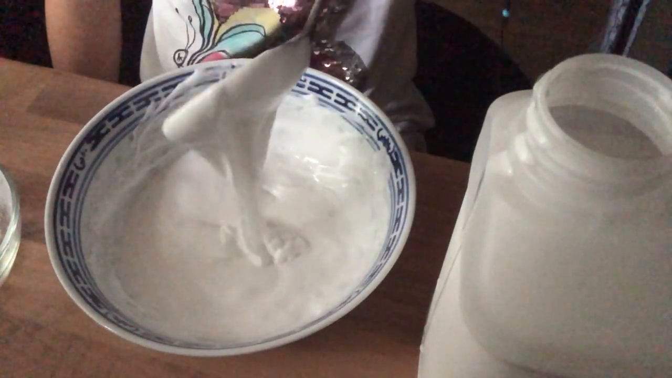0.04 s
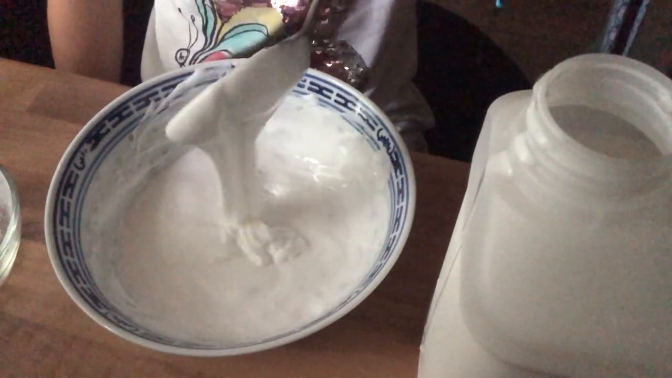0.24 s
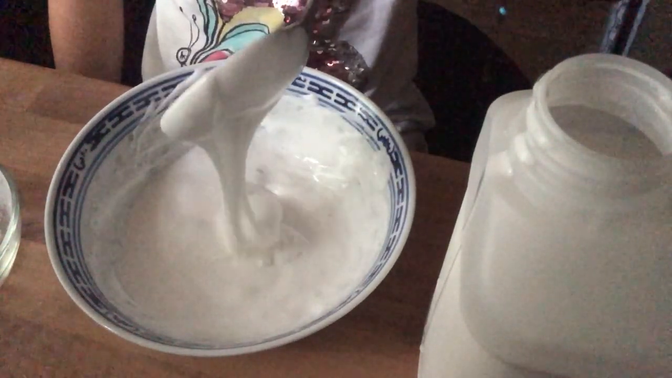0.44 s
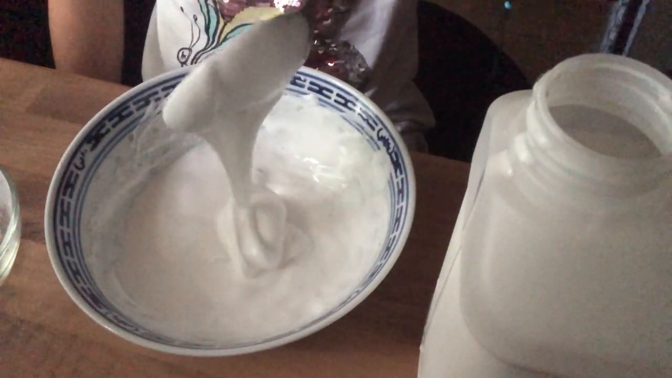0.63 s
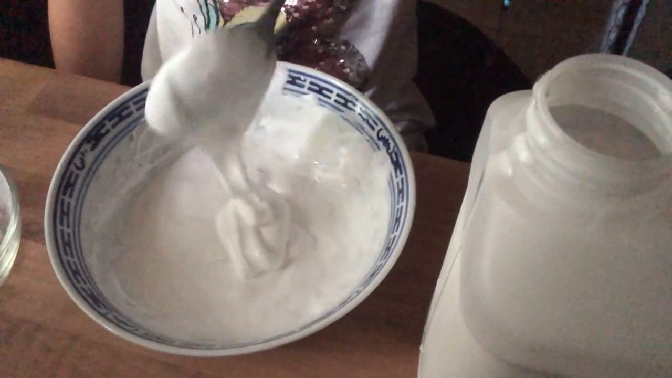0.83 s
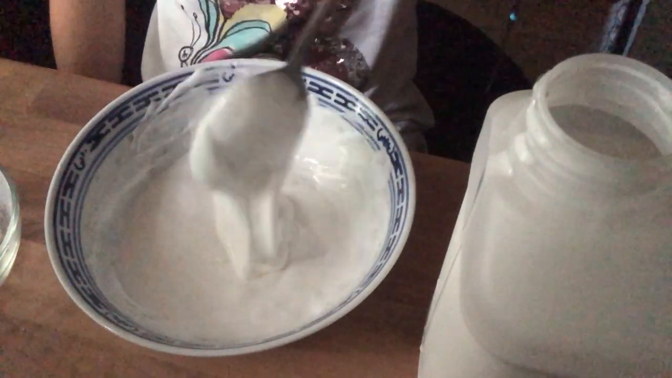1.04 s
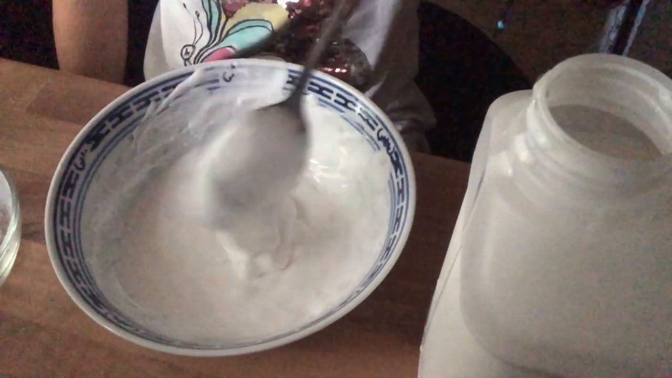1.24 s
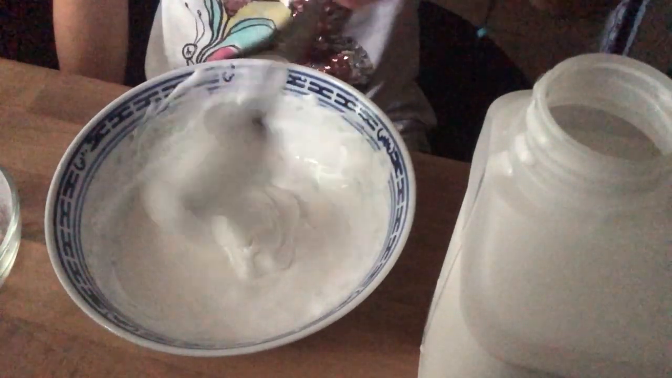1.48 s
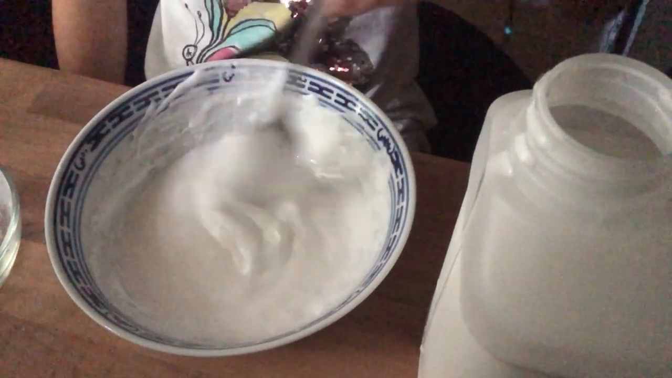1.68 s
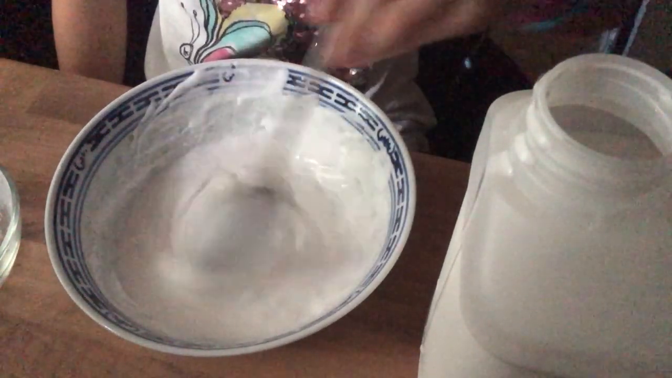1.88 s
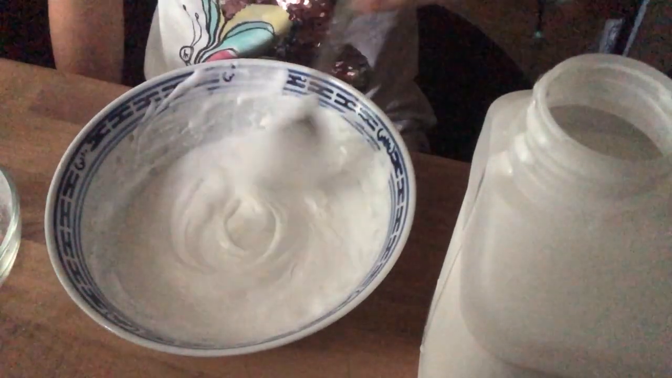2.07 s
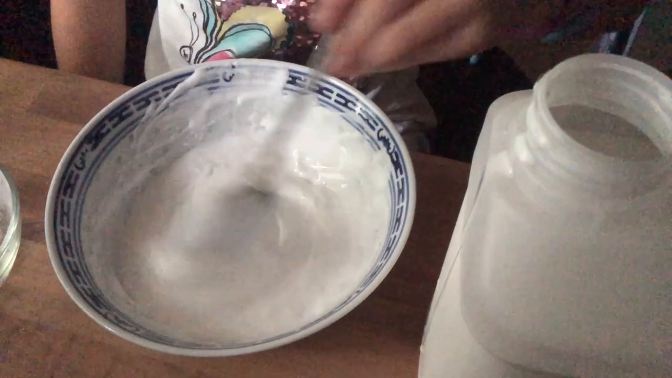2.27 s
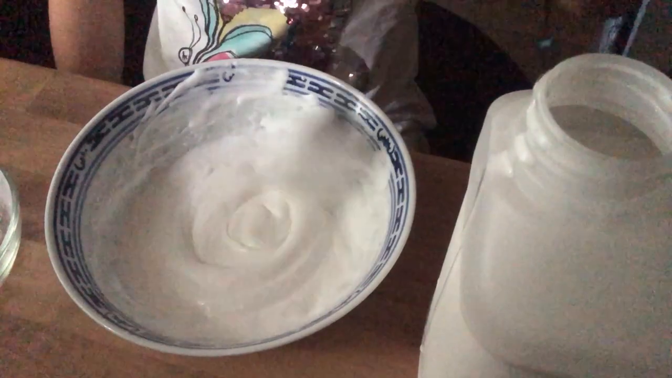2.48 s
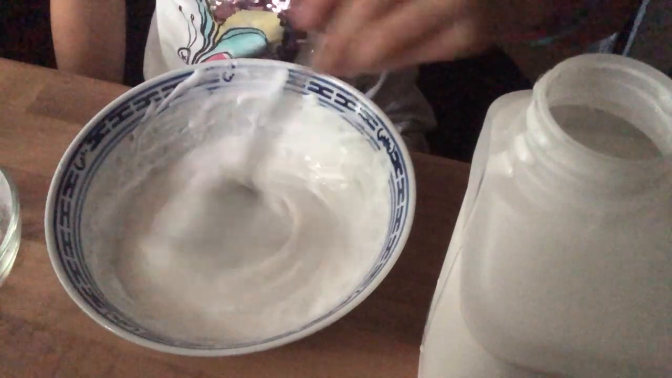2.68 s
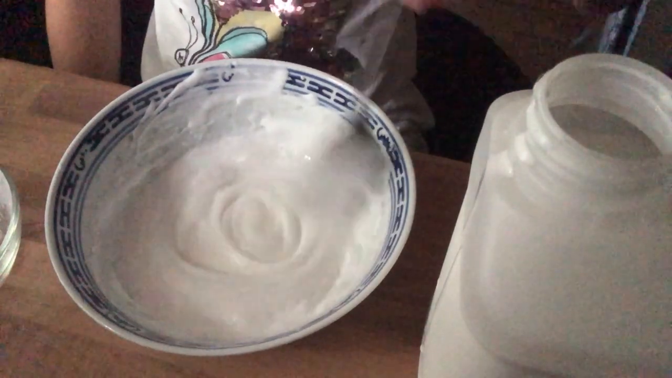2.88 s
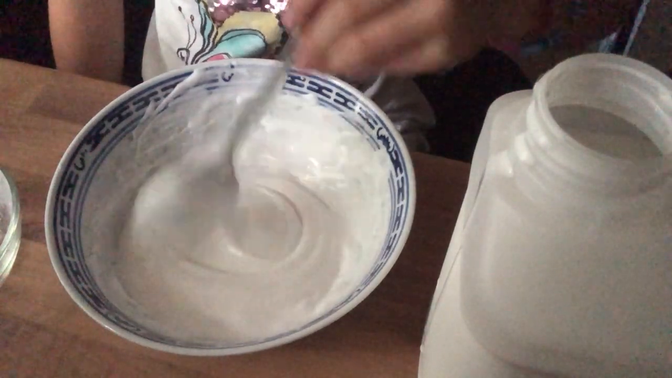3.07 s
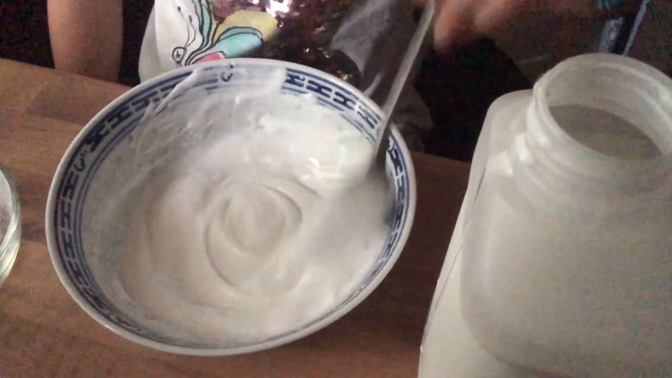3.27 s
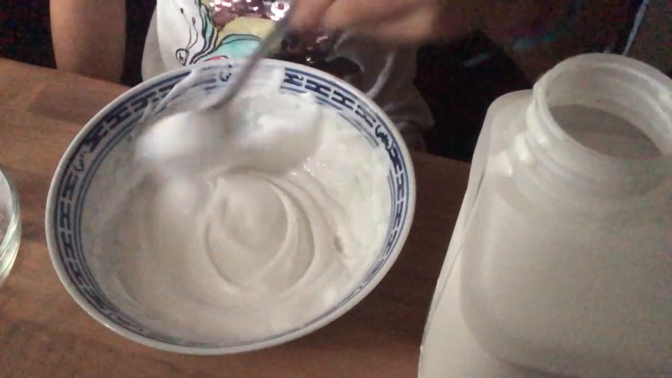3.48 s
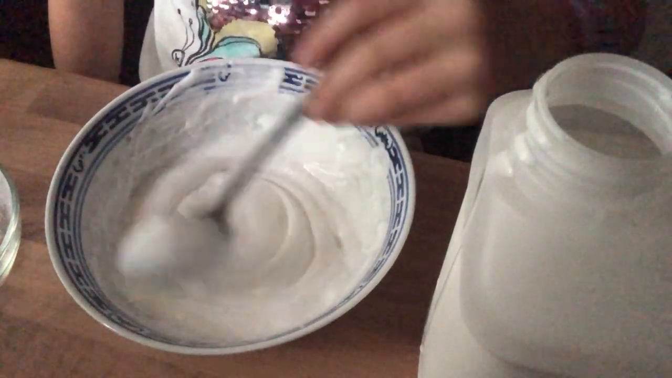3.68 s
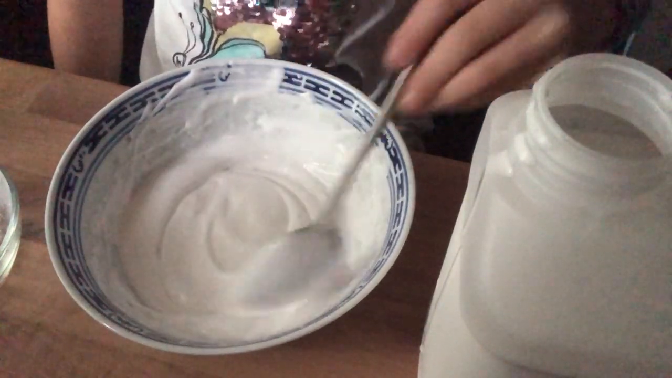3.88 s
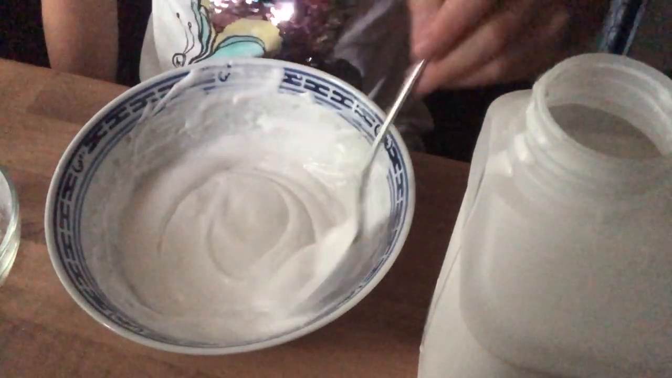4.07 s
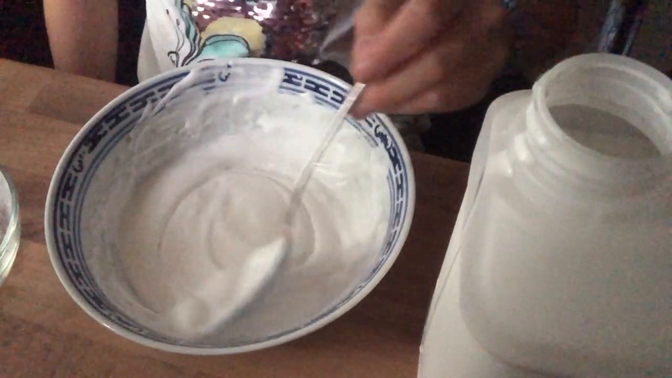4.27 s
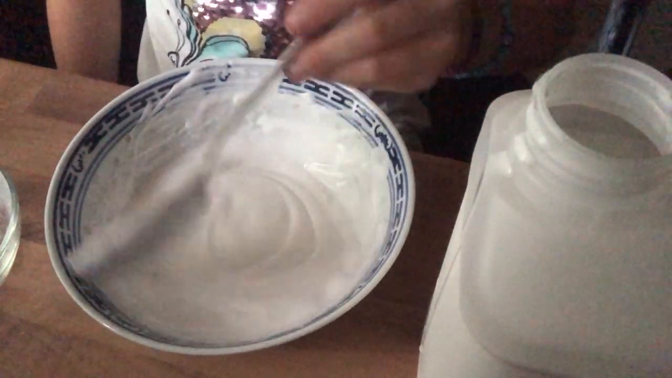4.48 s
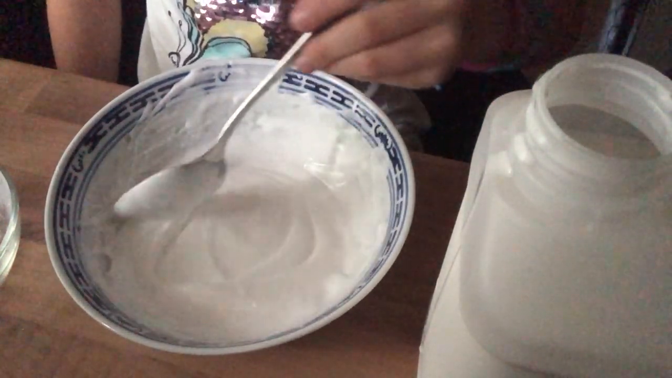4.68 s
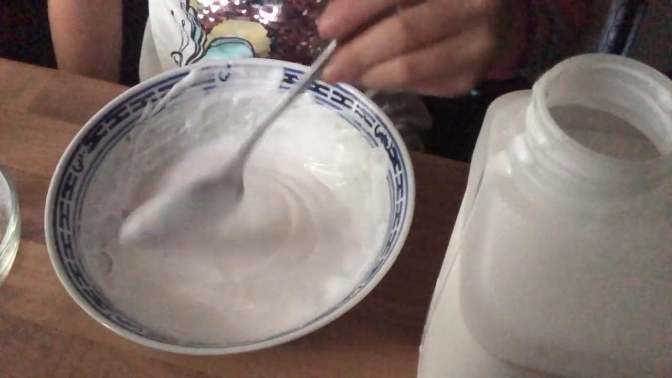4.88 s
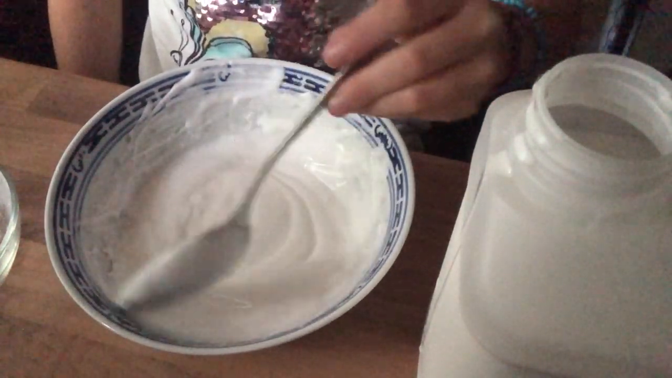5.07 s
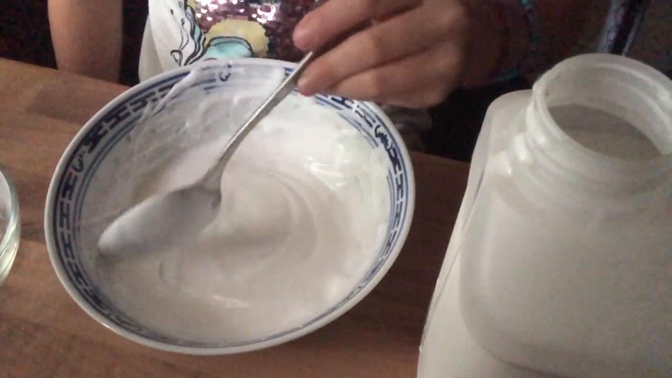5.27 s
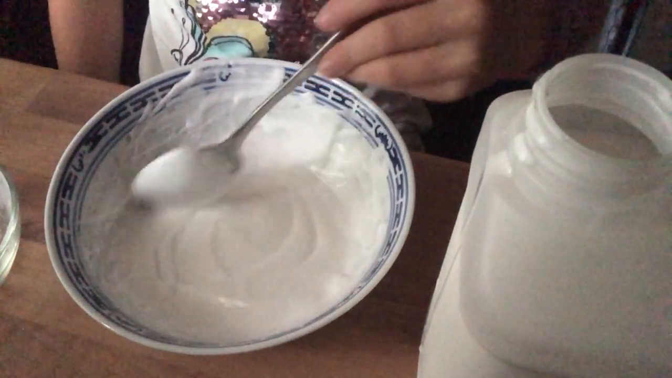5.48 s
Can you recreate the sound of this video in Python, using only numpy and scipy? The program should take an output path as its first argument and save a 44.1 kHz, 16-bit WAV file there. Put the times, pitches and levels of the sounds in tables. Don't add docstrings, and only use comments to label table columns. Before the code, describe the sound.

Quiet indoor hush, then dull and bright spoon knocks on a foam-filled china bowl, a brief rim ring and gritty little scraping strokes.

```python
import sys
import numpy as np
from scipy import signal
from scipy.io import wavfile
from scipy.ndimage import uniform_filter1d

SR = 44100
rng = np.random.default_rng(int(sys.argv[2]) if len(sys.argv) > 2 else 0)


def dump(signal):
    limited = np.clip(np.atleast_2d(signal).T, -1, 1)
    pcm = np.round(limited * 32767).astype(np.int16)
    wavfile.write(sys.argv[1], SR, pcm)


def nominal_scale(level):
    x = np.asarray(level, float) / 20
    return 10 ** x


N = 243431

# pitch_hz, level_db, time to fall 60 dB fade_s
TABLE_TONES = [(45, -13, .3), (68, -7, .35), (125, -7, .2), (172, -1, .16), (255, -1, .12)]


def evened(x):
    return x / np.sqrt(np.mean(x ** 2) + 1e-20)


def read(points, hz):
    f, value = np.transpose(points)
    return np.interp(np.log(hz + 1), np.log(f + 1), value)


def add(mix, start_s, sound):
    part = mix[round(start_s * SR):][:len(sound)]
    part += sound[:len(part)]


def resonate(x, hz, width_hz):
    r = np.exp(-np.pi * width_hz / SR)
    feedback = [1, -2 * r * np.cos(2 * np.pi * hz / SR), r * r]
    return (1 - r * r) / 2 * signal.lfilter([1, 0, -1], feedback, x)


def ringing(modes, length_s, contact_s):
    t = np.arange(round(length_s * SR)) / SR
    hz, db, fade_s = np.transpose(modes)[:, :, None]
    luck = rng.standard_normal((2, len(modes), 1))
    build = np.minimum(2 * t / contact_s, 1)
    decay_db = 60 * np.maximum(t - contact_s, 0) / fade_s
    swing = nominal_scale(db + 0.46 * luck[1] - decay_db) * build
    sound = (np.sign(luck[0]) * swing * np.sin(2 * np.pi * hz * t)).sum(0)
    return sound / abs(sound).max()


def knock(db, low_db, slope_db, wall):
    # pitch_hz, level_db, fade_s (60 dB)
    floor_tones = [(1500, -6, .02), (1810, -4, .03), (2070, -9, .025), (2330, -10, .025), (2720, -1, .055),
                   (2990, -5, .04), (3330, -12, .04), (4350, -18, .03), (4870, -20, .03), (6950, -20, .03),
                   (8410, -14, .035), (10450, -22, .03), (11680, -25, .04), (13550, -26, .02)]
    # pitch_hz, level_db, fade_s (60 dB)
    wall_tones = [(1900, -4, .03), (2082, -2, .025), (2640, -16, .04), (3336, -8, .03), (3692, -9, .035),
                  (4247, 1, .04), (4498, -8, .03), (4780, -4, .028), (4965, -9, .03), (5955, -5, .04),
                  (6570, -22, .04), (7300, -17, .03), (7913, -11, .025), (8850, -25, .04),
                  (10050, -23, .04), (10850, -26, .04), (11350, -27, .03), (12440, -19, .04),
                  (14500, -28, .02)]
    # pitch_hz, level_db, fade_s (60 dB)
    foot_tones = [(350, -2, .06), (440, 0, .05), (535, -5, .06), (590, -6, .06), (650, -2, .065),
                  (800, -14, .04), (990, -4, .05), (1090, -5, .05), (1250, -9, .04)]

    wall = np.clip(wall, 0, 1)
    contact_s = .0004 + .007 * wall ** 4
    t = np.arange(1300) / SR
    bounces = rng.standard_normal(1300) * (rng.random(1300) < .12)
    chatter = 0.86 * bounces * np.exp(-t / (contact_s + 0.00081))
    chatter[0] = 1
    rattle = signal.fftconvolve(chatter, crowd())

    bowl = nominal_scale(-1.5 - 6.5 * wall ** 2) * rattle / abs(rattle).max()
    bottom_ring = ringing(floor_tones, .1, contact_s)
    wall_ring = ringing(wall_tones, .1, contact_s)
    add(bowl, 0, (1 - wall) * bottom_ring + wall * wall_ring)
    bowl = softened(bowl, slope_db)

    out = nominal_scale(low_db - 21 - 6 * wall) * ringing(TABLE_TONES, 0.32, 0.0061)
    add(out, .001, nominal_scale(low_db) * ringing(foot_tones, .15, contact_s + 0.0037))
    add(out, 0, bowl / abs(bowl).max())
    return nominal_scale(db) * out


def crowd():
    # pitch_hz, level_db, fade_s (60 dB)
    faint_tones = [(100, -39, 0.045), (340, -5, 0.047), (971, -0.5, 0.015), (2210, 0, 0.048),
                   (2880, 0, 0.04), (4000, -12.5, 0.04), (8500, -26, 0.048), (14600, -33.5, 0.076)]
    f, db, fade_s = np.transpose(faint_tones)
    hz, t, z = signal.stft(rng.standard_normal(SR // 5), SR, nperseg=128)
    decay_db = 60 * t / read(np.c_[f, fade_s], hz)[:, None]
    z = z * nominal_scale(read(np.c_[f, db], hz)[:, None] - decay_db)
    sound = signal.istft(z, SR, nperseg=128)[1]
    return sound / abs(sound).max()


def softened(x, slope_db):
    hz = abs(np.fft.fftfreq(2048, 1 / SR))
    log_gain = np.log(nominal_scale(slope_db * np.log2(1 + (hz / 2000) ** 2) / 2))
    taps = np.fft.ifft(np.exp(log_gain - 1j * signal.hilbert(log_gain).imag)).real
    return signal.fftconvolve(x, taps[:512])[:len(x)]


def ring(start_s, blow_db, lean_db, place_deg, cut_hz):
    # pitch_hz, split of the pair split_hz, fade_s (60 dB), level_db
    rim_tones = [(890, 3, .45, 0), (1647, 3, .4, 0), (2776, 4, .27, 0), (4230, 40, .22, 4),
                 (5940, 40, .17, -3), (7870, 30, .12, 0), (10100, 60, .12, -14), (12400, 60, .1, -12)]
    # start_s, loss_db
    touches = [(3.004, -14), (3.555, -14), (3.665, -12), (4.667, -14)]

    t = np.arange(SR // 2) / SR
    out = np.zeros(len(t))
    for k, (hz, split_hz, fade_s, db) in enumerate(rim_tones):
        phase = rng.random() + np.array([0, split_hz / 200])
        upper = np.sin(2 * np.pi * ((hz + split_hz / 2) * t + phase[0]))
        lower = np.sin(2 * np.pi * ((hz - split_hz / 2) * t + phase[1]))
        pair = upper + .35 * lower
        place = np.sqrt(np.cos((k + 2) * np.radians(place_deg)) ** 2 + .003)
        lean = nominal_scale(lean_db * np.log2(hz / rim_tones[0][0]))
        contact = lean / np.sqrt(1 + (hz / cut_hz) ** 12)
        out += place * contact * nominal_scale(blow_db + db - 60 * t / fade_s) * pair
    loss_db = sum(db * np.clip((start_s + t - at) / .004, 0, 1)
                  for at, db in touches if at > start_s + .01)
    return out * nominal_scale(loss_db) * (1 - np.exp(-t / 0.0024))


def drag(length_s, db, load_db, speed_db):
    # pitch_hz, width_hz, level_db
    glaze_groups = [
        [(70, 60, -8), (180, 60, 1), (370, 90, -3), (475, 70, 0), (600, 90, 0)],
        [(1065, 60, -7), (1175, 60, 0), (1290, 70, -13), (880, 90, -14), (1420, 200, -17)],
        [(1650, 60, -6), (1920, 220, -1), (2100, 150, -4), (2790, 130, -9), (3320, 250, -5), (2600, 2200, -15)],
        [(4255, 110, 1), (4500, 90, -4), (4800, 110, -7), (5290, 120, -14), (5935, 80, 0), (7310, 150, -15),
         (7880, 60, -5), (10100, 70, -10), (11900, 100, -21), (12420, 90, -16), (15200, 120, -22),
         (4200, 2000, -14), (8500, 9000, -31)],
    ]
    # level_db, load_share [0-1], speed_share [0-1]
    group_follow = [(2, 0.88, 0.12), (1, 0, 0.15), (-2.5, 0.042, 0.59), (-10, 0.14, 0.77)]

    slips_per_s, clump_s, settle_s = 9000, .006, .04
    t = np.arange(0, length_s + settle_s, 1 / SR)
    clumps = evened(uniform_filter1d(rng.standard_normal(len(t)), round(clump_s * SR)))
    slips = nominal_scale(2 * rng.exponential(1, len(t)) + 3.5 * clumps)
    slips *= rng.choice([-1, 1], len(t)) * (rng.random(len(t)) < slips_per_s / SR)
    slips *= abs(np.sin(np.pi * np.minimum(t / length_s, 1) ** 0.55)) ** 1.26

    sound = np.zeros(len(t))
    for (group_db, load, speed), group in zip(group_follow, glaze_groups):
        part = np.zeros(len(t))
        for k, (hz, width_hz, tone_db) in enumerate(group):
            wide_hz = 1.1 * width_hz
            spot_db = 2.4 * rng.standard_normal()
            tone = resonate(resonate(slips, hz, wide_hz), hz, wide_hz)
            part += (-1) ** k * nominal_scale(tone_db + spot_db) * tone
        sound += nominal_scale(db - 5.5 + group_db + load * load_db + speed * speed_db) * evened(part)
    return sound


def pop(db, hz, fade_s):
    t = np.arange(4000) / SR
    fizz = resonate(resonate(rng.standard_normal(4000), hz, hz), hz, 2 * hz)
    return nominal_scale(db - 8.0) * evened(fizz) * np.exp(-t / fade_s)


def room(x):
    # pitch_hz, fade_s (60 dB)
    room_fade = [(150, 0.38), (500, 0.26), (2000, 0.19), (6000, 0.23), (14000, 0.044)]
    # delay_s, gain [x]
    near_echoes = [(.0011, .2), (.0034, -.25), (.0061, .16), (.0095, -.14), (.014, .11), (.021, -.09)]

    taps = np.zeros(SR // 2)
    at = np.arange(300, SR // 2 - 20, 20)
    taps[at + rng.integers(0, 20, len(at))] = rng.choice([-1., 1.], len(at))
    hz, t, z = signal.stft(taps, SR, nperseg=256)
    fading = nominal_scale(-60 * t / read(room_fade, hz)[:, None])
    tail = signal.istft(z * fading, SR, nperseg=256)[1]
    tail *= nominal_scale(-13.5) / np.linalg.norm(tail)
    for delay_s, gain in near_echoes:
        tail[round(delay_s * SR)] += gain
    return x + signal.fftconvolve(x, tail)[:N]


def air():
    # pitch_hz, level_db (per Hz)
    hiss_colour = [(12, -36.5), (20, -10.5), (53, -6), (70, -10.5), (86, -4.5), (120, -8.5), (154, -12),
                   (172, -18.5), (193, -10.5), (310, -14.5), (434, -16.5), (1030, -22.5), (1910, -25.5),
                   (14300, -36), (16000, -39)]
    # pitch_hz, width_hz, level_db
    hum_tones = [(64, 16, -77), (157, 18, -73), (315, 24, -82)]

    hz = np.fft.rfftfreq(2048, 1 / SR)
    a, b, patches = rng.standard_normal((N // 512 + 5, 1025, 3)).T
    patches = evened(uniform_filter1d(uniform_filter1d(patches, 20, 0), 8, 1))
    z = (a + 1j * b) * nominal_scale(read(hiss_colour, hz)[:, None] + 0.37 * patches)
    out = nominal_scale(-69.5) * evened(signal.istft(z, nperseg=2048, noverlap=1536)[1][:N])
    noise = rng.standard_normal(N)
    for f, width_hz, db in hum_tones:
        out += nominal_scale(db) * evened(resonate(resonate(noise, f, width_hz), f, width_hz))
    return out


def scene():
    # start_s, level_db (peak), low_db (low knock against the blow),
    # slope_db (treble, per octave), wall [share 0-1]
    knocks = [(2.1156, -18, -3.5, -2.5, 0), (2.8455, -13, -7, -3, 0.66), (3.0045, -23, -9, -6.5, 0.12),
              (3.2708, -28, 6, -18.5, 0.49), (3.336, -42, -8, -2.5, 0.36), (3.4722, -34, 0.5, -37, 0.46),
              (3.4995, -30.5, 1, -9, 0.3), (3.5132, -16.5, -15, -7.5, 0.29), (3.5565, -19, -30, -3.5, 0.56),
              (3.596, -33.5, 6, -1.5, 0.6), (3.618, -48, 6, 9, 0.9), (3.665, -39.5, -9, -4, 0.4),
              (3.679, -30.5, -14, -4.5, 0.3), (3.8215, -38, -4.5, -7, 0.3),
              (3.863, -37.5, -5.5, -5.5, 0.14), (4.2125, -25, -8.5, -7, 0.22), (4.618, -42, 16, 2.5, 0.28),
              (4.638, -55.5, 12.5, -16, 0.8), (4.667, -19.5, -12.5, -12, 0.48),
              (5.0419, -11, -11.5, 2.5, 0.89)]
    # start_s, level_db
    shoves = [(2.2, -58), (3.289, -40), (3.36, -54), (3.679, -41.5), (3.78, -49), (4.2127, -46.5),
              (5.05, -42)]
    # start_s, level_db, lean_db (to high tones, per octave),
    # place_deg (round the rim), cut_hz (top of the contact)
    rings = [(2.118, -61.5, 8, 36, 2530), (2.846, -32.5, -1, 64.5, 2600), (2.849, -41, 1, 22, 8500),
             (3.005, -55.5, -10, 21, 7100), (3.272, -61.5, 29, 19.4, 1316), (3.512, -46, 27, 20.6, 1430),
             (3.554, -40.5, 18.5, 25.2, 1810), (3.692, -78, 21, 67, 1900), (3.864, -68, 20, 26.5, 1525),
             (4.214, -74.5, 22.9, 19.8, 2435), (4.619, -36.5, 17.5, 31.5, 1080),
             (4.667, -40.5, 5, 16.1, 3200), (5.044, -71.5, 14, 20, 6560), (5.404, -93, 18.5, 18.7, 3620)]
    # start_s, length_s, level_db, load_db, speed_db
    strokes = [(1.549, 0.22, -79.5, -12, 13), (3.279, 0.16, -70.5, 5, 5), (3.656, 0.05, -52.5, 2.5, 5),
               (3.7, 0.27, -77.5, 10, 7), (3.806, 0.1, -59.5, -0.5, -3.5), (3.94, 0.6, -76.5, -7, 11.5),
               (4.22, 0.056, -58.5, -1, 4.5), (4.272, 0.044, -61, -1, 1), (4.305, .045, -54, -5, -2.5),
               (4.34, 0.085, -52.5, -6, 10), (4.411, 0.095, -60.5, -0.5, 6), (4.452, 0.074, -55, -3, 2.5),
               (4.494, 0.076, -45.5, -7.5, -9.5), (4.551, 0.081, -55, 5, -9.5),
               (5.044, 0.12, -59.5, 8.5, 17.5), (5.141, 0.071, -58.5, -1, 6), (5.18, 0.061, -48, -4, 1.5),
               (5.222, 0.058, -45.5, -5, -7), (5.255, 0.043, -52.5, 6.5, -15), (5.315, .05, -64.5, -3, -3),
               (5.352, 0.064, -60.5, 0, -6.5), (5.388, 0.066, -73, 5.5, -1)]
    # start_s, level_db (peak), pitch_hz, fade_s
    pops = [(1.625, -57, 2520, 0.0049), (1.688, -57, 3450, .004), (1.928, -50.5, 4000, 0.0032),
            (2.339, -64, 3020, 0.0041), (2.619, -66, 2500, 0.0044), (3.265, -49, 3000, 0.0071),
            (3.273, -52.5, 8000, 0.034), (3.338, -48.5, 6100, 0.0098), (3.865, -62, 2750, 0.029),
            (5.485, -52, 170, 0.017)]

    bowl = np.zeros(N)
    for start_s, *row in knocks:
        add(bowl, start_s, knock(*row))
    for start_s, db in shoves:
        add(bowl, start_s, nominal_scale(db) * ringing(TABLE_TONES, .35, 0.013))
    for start_s, *row in rings:
        add(bowl, start_s, ring(start_s, *row))
    for start_s, *row in strokes:
        add(bowl, start_s, drag(*row))
    for start_s, *row in pops:
        add(bowl, start_s, pop(*row))
    return (nominal_scale(-2.5) * room(bowl) + air())[None]


def roll_off(x):
    return signal.sosfilt(signal.butter(12, 16220, fs=SR, output="sos"), x)


def record(dry):
    top_edge = signal.firwin(255, 15850, window=("kaiser", 9), fs=SR)
    heard = signal.oaconvolve(dry, top_edge[None], "same")
    return roll_off(heard)


dry = scene()
out = record(dry)
dump(out)
```